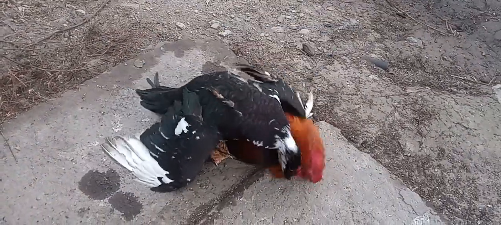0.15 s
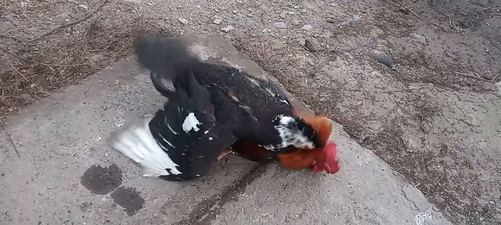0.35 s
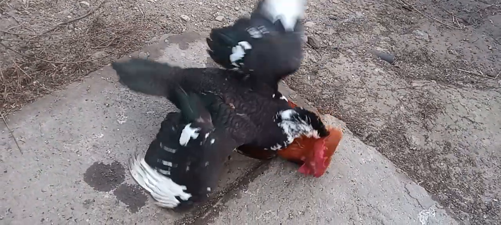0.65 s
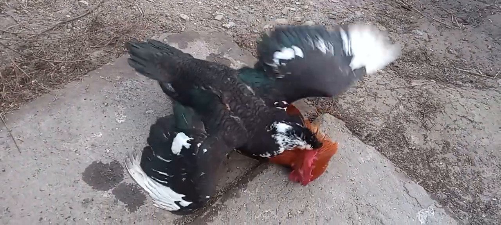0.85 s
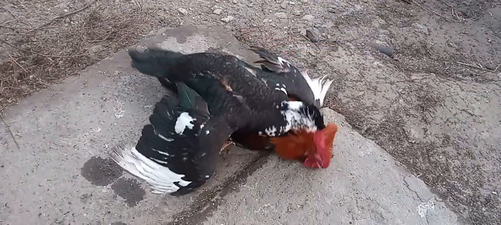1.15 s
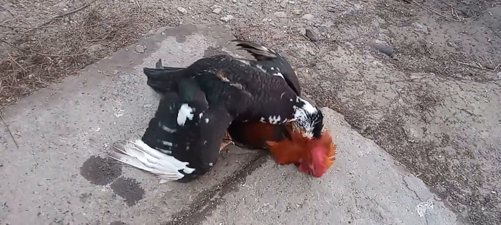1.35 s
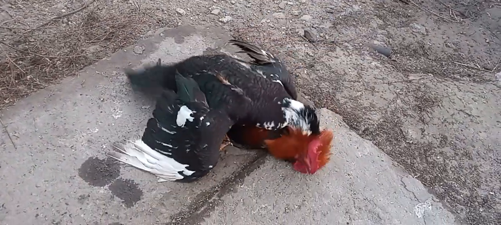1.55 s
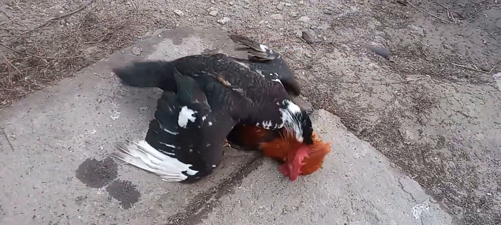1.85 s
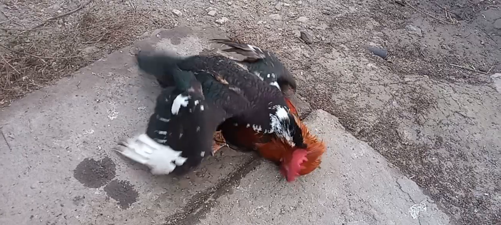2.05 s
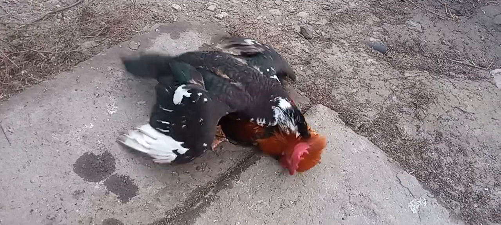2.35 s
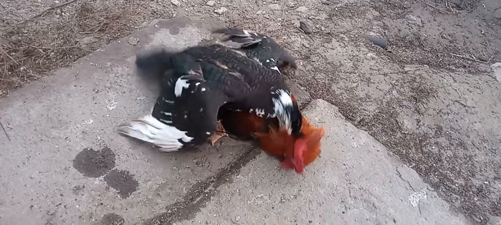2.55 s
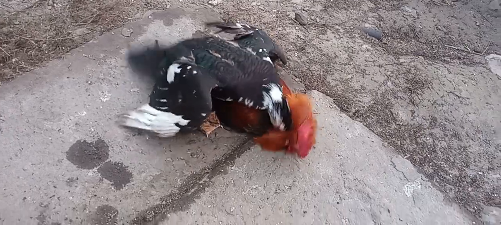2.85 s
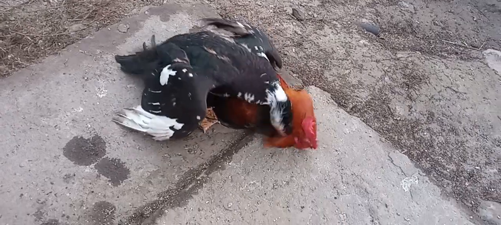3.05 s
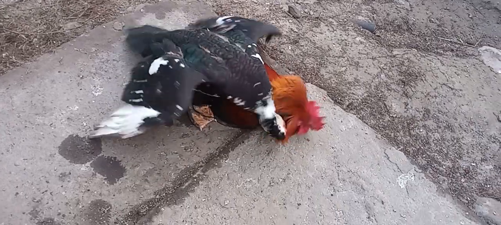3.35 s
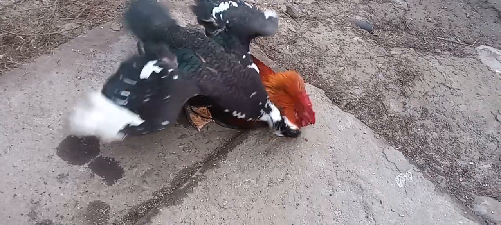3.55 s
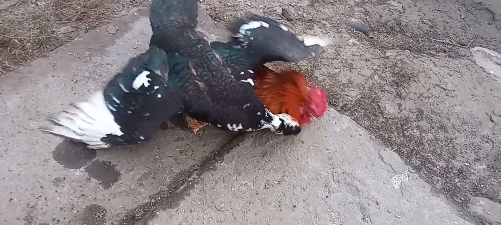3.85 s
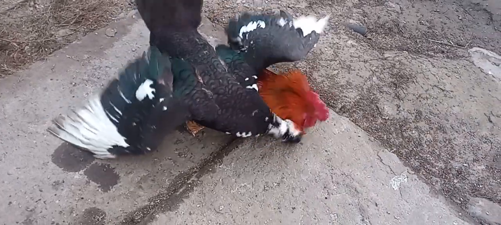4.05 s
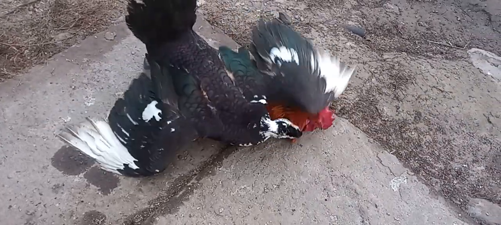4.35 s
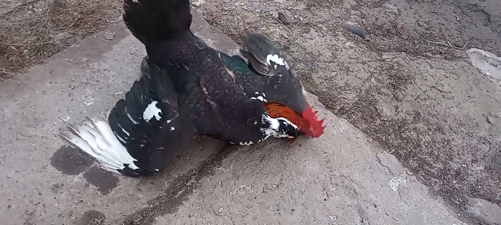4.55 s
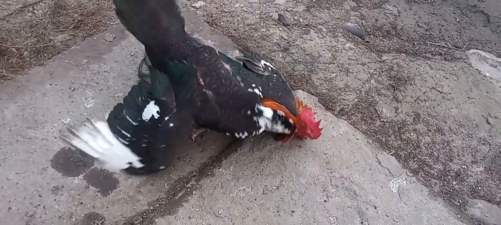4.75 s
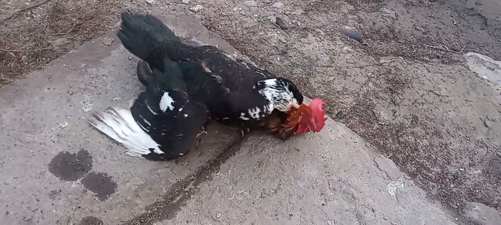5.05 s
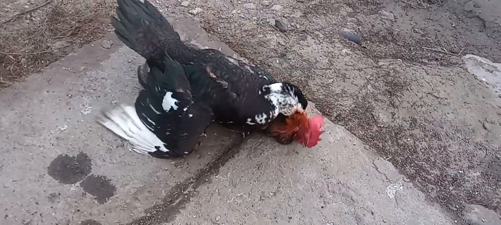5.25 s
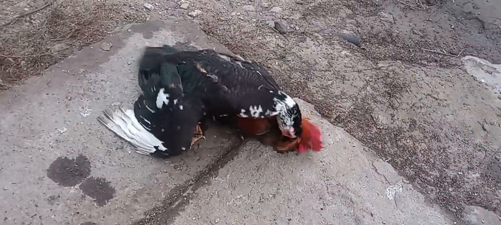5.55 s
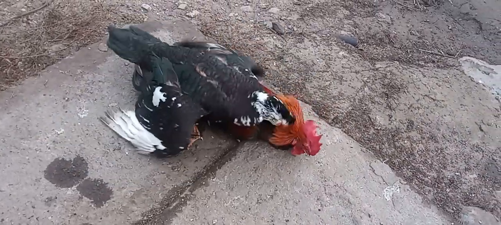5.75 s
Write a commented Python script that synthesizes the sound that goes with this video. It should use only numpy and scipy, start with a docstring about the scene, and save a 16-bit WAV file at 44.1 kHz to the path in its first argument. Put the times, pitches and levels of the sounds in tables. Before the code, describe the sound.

Two birds struggle on a concrete slab. A quick run of hollow bill clacks leads into one loud wing slap, then sparse clacks and dry snaps; later, feather brushing, soft thuds and huffs thicken. Young birds peep thinly almost throughout. Quiet outdoor yard, close stereo microphone, short reflections.

```python
"""A young bird peeps and a bill clacks several times in a row; soon a wing slaps down hard.
A drake is pinning a rooster on a concrete slab: feathers are noise and tiny clicks, huffing bursts are
narrow noise, and the bill is a tick with a short hollow ring. Bodies bump, quills snap and squeak.
Young birds peep on as gliding tones, each peep followed by a quick flick, over quiet air and a low rumble."""
import sys
import numpy as np
from scipy import signal
from scipy.fft import rfft, irfft, next_fast_len
from scipy.io import wavfile

SR = 44100
rng = np.random.default_rng(int(sys.argv[2]) if len(sys.argv) > 2 else 0)


def bounce(signal):
    """Save signal as a 16-bit WAV file at the path given by the first command-line argument."""
    frames = np.transpose(np.atleast_2d(signal))
    limited = np.clip(frames, -1, 1)
    pcm = np.round(limited * 32767).astype(np.int16)
    wavfile.write(sys.argv[1], SR, pcm)


N = 259749
TIME = np.arange(N) / SR

# Levels marked "relative" get one more fixed gain where the sound is made.
# feathers slide over feathers and concrete:
# [start_s, length_s, swell_db from start to end, relative hiss_db, relative brush_db]
STROKES = [(0.01, 0.07, 2, -63.5, -63), (0.176, 0.04, -2.5, -58, -81), (0.262, 0.032, -4.5, -45, -44),
           (0.3, 0.13, -13, -77, -63.5), (0.962, 0.049, -14, -67, -62.5), (1.339, 0.029, -2, -63.5, -57),
           (2.746, 0.12, -3, -60.5, -52.5), (3.009, 0.096, 6, -66.5, -62), (3.14, 0.12, 2, -73, -73),
           (3.356, 0.11, 1, -60, -67), (3.5, 0.076, -1, -64.5, -61), (3.707, 0.06, 2.5, -62.5, -57),
           (3.79, 0.034, 10.5, -70, -71), (3.926, 0.048, 2, -60.5, -66.5), (4.027, 0.063, 1.5, -62, -57.5),
           (4.206, 0.14, -10, -68.5, -69.5), (4.389, 0.012, 9, -74, -66), (4.504, 0.23, 8.5, -60, -66),
           (4.843, 0.039, 7.5, -60.5, -58), (4.958, 0.042, 3, -59, -58), (5.078, 0.21, 7.5, -64.5, -78),
           (5.422, 0.17, -4, -71, -68), (5.793, 0.11, 2, -68.5, -76)]
STROKE_ATTACK_S, STROKE_RELEASE_S = 0.015, 0.014
# bright upper hiss that swells or fades: [start_s, length_s, swell_db, relative level_db]
BRIGHT_HISSES = [(4.072, 0.02, 14, -58.5), (4.504, 0.22, 24.5, -60), (4.847, 0.056, -5, -57),
                 (4.963, 0.02, 8, -52.5)]
# a wing tip scrapes the concrete: [time_s, level_db]
SCRAPE = [(3.692, -83), (3.704, -49), (3.73, -46.5), (3.765, -58)]
# wing slap and the sweep after it: [time_s, level_db]
SLAP = [(.15, -58), (.224, -79), (.229, -32.5), (.233, -21.5), (.242, -27.5), (.25, -31), (.27, -43)]
# the bodies bump: [start_s, relative level_db, time_to_die_away_s (by 60 dB)]
BUMPS = [(0.054, -54.5, 0.19), (0.254, -38, 0.36), (0.345, -64, 0.17), (1.34, -51.5, 0.16),
         (1.624, -63, .1), (2.206, -67, 0.11), (2.81, -61.5, 0.36), (3.033, -50.5, 0.22),
         (3.075, -56.5, 0.14), (3.275, -55.5, 0.12), (3.725, -53.5, 0.27), (3.813, -55, 0.16),
         (4.086, -61, 0.14), (4.409, -69, 0.089), (4.74, -59, .14), (4.862, -54, 0.41), (4.985, -64, .22)]
BUMP_ATTACK_S = 0.0045
# huffing bursts, the first the air of the wing slap, the others perhaps the drake's breath:
# [start_s, length_s, swell_db, relative level_db, centre_hz at mid-burst]
HUFFS = [(0.256, 0.029, 4, -42, 500), (2.762, 0.097, -17, -51.5, 640), (3.49, 0.091, -5.5, -54, 615),
         (3.714, 0.053, -2.5, -55.5, 470), (4.03, 0.066, -2, -51, 490), (4.526, .19, 9, -59.5, 600),
         (4.858, 0.029, -2, -53.5, 476), (4.968, 0.04, 3, -57, 520), (5.085, 0.18, -4, -71, 550),
         (5.515, 0.056, -15, -66, 680)]
HUFF_ATTACK_S, HUFF_RELEASE_S = 0.012, 0.012
HUFF_SAG_HZ = 69.73  # the centre sinks by this much over each burst

# bill clacks: [start_s, relative ring_db, ring_hz, ring_time_s, relative tick_db]
CLACKS = [(0.052, -41.5, 810, 0.05, -44.5), (0.071, -41, 791, 0.033, -50), (0.075, -41, 861, 0.049, -57),
          (0.081, -38.5, 782, 0.026, -47), (0.09, -40.5, 802, 0.031, -50), (0.94, -48, 1160, 0.018, -54),
          (0.947, -37, 766, 0.04, -43.5), (1.337, -36, 809, 0.039, -37.5), (1.623, -37, 795, 0.034, -43),
          (1.909, -44.5, 1890, 0.012, -44), (2.204, -37, 707, 0.016, -40), (2.746, -31.5, 818, 0.027, -42),
          (3.066, -41, 788, 0.047, -49.5), (5.498, -39, 884, 0.032, -44), (5.503, -47.5, 1310, .025, -57),
          (5.525, -55.5, 1140, .025, -61)]
# ways the hollow bill rings: [multiple of ring_hz, level_db]
BILL_MODES = [(0.639, -12), (.83, -4.5), (0.998, 0.5), (1.362, -11.5), (1.62, -15), (2.45, -22.5)]
# dry snaps of quills and claws on the concrete: [start_s, relative level_db, lower_edge_hz]
SNAPS = [(0.2325, -35, 2400), (0.236, -25.5, 2430), (0.241, -37, 2400), (1.052, -45, 9000),
         (1.332, -43, 2400), (1.337, -32, 2440), (1.343, -43, 2400), (1.62, -48, 2400),
         (1.909, -31.5, 2390), (1.991, -42.5, 9000), (2.204, -62, 5000), (2.326, -45, 9000),
         (2.343, -33.5, 9000), (2.363, -46, 9000), (2.435, -48, 1000), (2.742, -21, 2430),
         (2.745, -40, 2400), (5.085, -35, 7950)]
SNAP_WIDTH_HZ = 4500
# feather squeaks: [time_s, level_db, pitch_hz]
SQUEAKS = [(0.501, -42.5, 6030), (1.7572, -53.5, 5750), (2.1096, -40, 6710)]
# course of a squeak: [time_s from its own zero, pitch_ratio, level_db]
SQUEAK_SHAPE = [(-.008, .98, -22), (0, .995, -3), (.006, 1.0, 0), (.014, .995, -2), (.026, .985, -22)]
# tones in a squeak: [multiple of its pitch, level_db]
SQUEAK_PARTIALS = [(0.872, -13.5), (1.003, -3), (1.152, -4.5), (1.31, -3), (1.552, -9.5), (1.798, -7)]

# near bird: [time_s, peep_db, pitch_hz of the strong second harmonic, flick_db]
PEEPS = [(-0.016, -46.5, 5050, -33), (0.164, -45.5, 4880, -40.5), (0.7007, -37, 5090, -40),
         (0.832, -38, 5086, -40), (0.9663, -38.5, 4997, -44), (1.1045, -34, 5020, -37),
         (1.264, -36.5, 5025, -42.5), (1.471, -38.5, 5004, -44), (1.633, -39, 4970, -40),
         (1.786, -39.5, 4960, -36), (1.984, -42, 5020, -36.5), (2.1478, -39.5, 4916, -36),
         (2.3339, -38.5, 4955, -38), (2.5285, -40.5, 5004, -37), (2.7305, -42, 4790, -39),
         (2.93, -42.5, 5080, -37), (3.1333, -42.5, 4830, -39), (3.353, -43.5, 4840, -41),
         (3.555, -42, 4950, -37), (3.741, -43.5, 5054, -41.5), (3.9396, -41.5, 4910, -39),
         (4.2048, -39.5, 4966, -40.5), (5.096, -48, 5050, -39.5), (5.4008, -42, 4940, -46.5),
         (5.569, -50, 4990, -44.5), (5.711, -51, 5040, -51)]
# softer, lower peeps of a farther bird: [time_s, peep_db, pitch_hz, flick_db]
FAR_PEEPS = [(0.395, -60, 4560, -51), (0.5326, -55.5, 4520, -54.5), (0.676, -49.5, 4500, -51),
             (0.805, -52, 4560, -61), (1.063, -59, 4500, -63), (1.205, -50.5, 4540, -59),
             (1.347, -50, 4540, -64), (2.443, -65, 4550, -57.5), (2.85, -54, 4600, -59.5),
             (2.991, -49, 4650, -59), (3.2738, -50, 4520, -58), (3.689, -49.5, 4600, -61),
             (3.8408, -53, 4600, -60), (3.995, -55, 4400, -55), (4.145, -60, 4430, -64),
             (4.3095, -53, 4450, -65.5), (5.76, -60, 4590, -73)]
# course of a peep: [time_s from its own zero, pitch_ratio, level_db]
PEEP_SHAPE = [(-.011, .925, -38), (-.004, .96, -19), (-.0005, .985, -4), (.003, 1.0, 0), (.013, 1.009, -1),
              (.02, 1.01, -12), (.03, 1.0, -34)]
# course of a near flick: [time_s from its own zero, pitch_ratio, level_db]
FLICK_SHAPE = [(-.006, .76, -26), (-.002, .83, -9), (.002, .95, -2), (.005, 1.02, 0), (.012, 1.01, -2),
               (.016, .9, -9), (.023, .82, -22)]
# tones in a peep: [multiple of its pitch, level_db]
PEEP_PARTIALS = [(0.502, -18.5), (1, -2), (1.528, -23.5)]
# tones in the raspy near flick: [multiple of its pitch, level_db]
FLICK_PARTIALS = [(0.859, -13.5), (.99, -6), (1.06, -24)]
FLICK_HZ, FAR_FLICK_HZ = 3672, 3500
FLICK_SPREAD = 0.0299  # share by which the pitch differs from one near flick to the next
FLICK_AFTER_S, FAR_FLICK_AFTER_S = 0.019, 0.027  # from a peep's time to its flick's time
YARD_T60_S = 0.16  # time for the yard's scatter to fall by 60 dB
WALL_ECHO_S, WALL_ECHO_DB = 0.05, -21
# faint tones, short or long, one of them ringing after the slap: [start_s, length_s, pitch_hz, level_db]
FAINT_TONES = [(0.3, 0.097, 1900, -59), (1.925, 0.033, 813, -66), (2.09, 0.12, 614, -74.5),
               (2.13, 0.29, 1915, -67.5), (2.431, 0.0069, 1240, -61)]

# light rustle of plumage between strokes: [time_s, relative level_db]
PLUMAGE = [(0, -63), (.55, -55), (1.25, -59.5), (1.5, -63.5), (2.25, -63.5), (2.55, -61), (2.92, -59.5),
           (4.8, -62), (5.15, -57), (5.89, -63)]
PLUMAGE_WAVER_DB = -3.84
# swells of the low rumble: [start_s, length_s, level_db]
RUMBLE_SWELLS = [(0.28, 0.084, -62), (2.17, 0.056, -61), (3.06, 0.16, -74), (4.905, 0.039, -67)]
RUMBLE_DB, RUMBLE_WAVER_DB = -78, 2.5
AIR_DB, AIR_WAVER_DB = -70.5, 2.0

# tone colour of hissing feathers: [frequency_hz, level_db per Hz]
HISS = [(1500, -7.5), (2600, -8.5), (3600, -5.5), (5000, -4), (6600, 4.5), (7800, -4), (9600, 1),
        (12500, -13), (15500, -6.5)]
# tone colour of brushing feathers: [frequency_hz, level_db per Hz]
BRUSH = [(450, -20), (800, 0.5), (1100, 8.5), (1600, 1), (2500, -1.5), (3500, 5), (5000, -8), (8000, -23),
         (15000, -53)]
# tone colour of the bright upper hiss: [frequency_hz, level_db per Hz]
BRIGHT_COLOUR = [(4500, -29), (7000, 0), (8300, 2.5), (9300, 8), (11200, -5), (13000, -11), (15500, -12)]
# resonances of the scrape: [frequency_hz, level_db per Hz]
SCRAPE_COLOUR = [(1100, -11), (1520, -3.5), (1900, 2), (2400, -9), (3100, -3), (4000, -18), (4700, -9),
                 (8000, -42)]
# tone colour of the wing slap: [frequency_hz, level_db per Hz]
SLAP_COLOUR = [(80, -24), (250, -4), (500, 17.5), (1100, 9.5), (2400, -2), (3800, 13), (6500, 9),
               (10000, 10), (13000, 10), (15500, 9.5)]
# tone colour of the bumps: [frequency_hz, level_db per Hz]
THUMP = [(50, -77), (120, -5.5), (240, 8.5), (380, 10.5), (550, -0.5), (1000, -18)]
# tone colour of the outdoor air: [frequency_hz, level_db per Hz]
AIR = [(25, -13), (60, -7), (120, 9), (250, 2), (550, 3), (1000, -6), (2000, -1), (3500, 2), (6000, -3),
       (15000, -39)]
# tone colour of the rumble: [frequency_hz, level_db per Hz]
RUMBLE = [(25, -28), (50, 0.5), (95, 9), (135, -3.5), (220, -16.5)]

# colour of the two microphone ports: [frequency_hz, left_db, right_db]
PORTS = [(1150, -2.5, 0), (2800, -2, -6), (3380, -5, 0.5), (4660, 4, -4.5), (6070, 9, -4.5),
         (7580, 4.5, -6), (8280, -15, -7.5), (9840, -22, 2.5), (11800, -14.5, -14), (13000, -14, -12.5),
         (15300, -1.5, -1.5)]
# how far the left port leads the right: [frequency_hz, phase_radians]
PORT_PHASE = [(50, 0), (1100, -.5), (2000, 0), (2700, 1), (3400, 1), (4300, 1.42), (4850, 5), (6300, 4.5),
              (7100, 3), (7900, 1.24), (9600, 2.6), (12000, 1), (14300, 1.4), (15700, 4)]
CUTOFF_HZ = 15900


def feathers():
    """Sliding feathers hiss and brush with each stroke, and a wing tip scrapes the slab."""
    hiss_gain = brush_gain = 0
    for s, length, swell_db, hiss_db, brush_db in STROKES:
        movement = stroke(s, length, swell_db, 0, STROKE_ATTACK_S, STROKE_RELEASE_S)
        hiss_gain = hiss_gain + from_db(hiss_db) * movement
        brush_gain = brush_gain + from_db(brush_db) * movement
    hiss = from_db(7.0) * hiss_gain * fluttering(HISS, patchy_db=3.5, grain=1.17)
    brush = from_db(-0.5) * brush_gain * fluttering(BRUSH, patchy_db=3.0, grain=0.46)
    scrape = level(SCRAPE) * fluttering(SCRAPE_COLOUR, patchy_db=1.0, grain=1.8)
    return hiss + brush + scrape


def wing_slap():
    """A wing hits the slab: a sudden burst of noise and dense barb clicks, then a short sweep."""
    burst = air_noise(0.6) + 1.46 * barbs(3000, spread_db=-7.0)
    return level(SLAP) * coloured(burst, SLAP_COLOUR)


def bright_hiss():
    """Bright, grainy hiss around 9 kHz that swells or fades and stops."""
    gain = sum(stroke(*row, attack_s=0.017, release_s=0.0098) for row in BRIGHT_HISSES)
    return from_db(3) * gain * fluttering(BRIGHT_COLOUR, patchy_db=-1.5, grain=1.2)


def body_bumps():
    """Bodies bump: low noise starts quickly and dies away smoothly."""
    # ln(1000) turns the time for a 60 dB fall into the time constant of the fade
    gain = sum(stroke(s, 1 / SR, 0, db, BUMP_ATTACK_S, t60 / np.log(1000)) for s, db, t60 in BUMPS)
    return from_db(-4.0) * gain * coloured(air_noise(0.46), THUMP)


def huffing_bursts():
    """Huffing bursts of air: a narrow band of noise whose centre sinks during each burst."""
    gain = sum(stroke(*row[:4], HUFF_ATTACK_S, HUFF_RELEASE_S) for row in HUFFS)
    centre_points = []
    for s, length, _, _, hz in HUFFS:
        centre_points.append((s, hz + HUFF_SAG_HZ / 2))
        centre_points.append((s + length, hz - HUFF_SAG_HZ / 2))
    centre_hz = np.interp(TIME, *np.transpose(centre_points))
    # slow complex noise, shifted up to the centre pitch
    core = signal.butter(1, 40, fs=SR, output="sos")
    skirt = signal.butter(1, 260, fs=SR, output="sos")
    slow_noise = signal.sosfilt(np.vstack([core, skirt]), air_noise(0.44) + 1j * air_noise(0.27))
    carrier = np.exp(2j * np.pi * np.cumsum(centre_hz) / SR)
    return from_db(-5.0) * gain * rms_one(np.real(slow_noise * carrier))


def off_slab(x, gain_db):
    """The concrete throws the sound back a moment later; the lag wanders as the birds move."""
    lag = SR * (0.001345 + 0.0003 * drift(1.5))
    bounced = np.array([np.interp(np.arange(N) - lag, np.arange(N), side) for side in x])
    return x + from_db(gain_db) * bounced


def bill():
    """Each clack is a tick and a few cycles of the bill's hollow ring, which shifts with the gape."""
    out, t = np.zeros((2, N)), np.arange(SR // 10) / SR
    too_small_for_bass = signal.butter(4, 470, "high", fs=SR, output="sos")
    ratio, mode_db = np.transpose(BILL_MODES)
    sign = (-1) ** np.arange(len(ratio))  # neighbouring modes swing in opposite senses
    for s, ring_db, hz, ring_s, tick_db in CLACKS:
        strengths = sign * from_db(mode_db + rng.normal(0, 1.3, len(ratio)))
        pitches = hz * ratio * rng.normal(1, 0.02, len(ratio))
        modes = strengths @ np.sin(2 * np.pi * np.outer(pitches, t))
        ring = signal.sosfilt(too_small_for_bass, modes * from_db(-60 * t / ring_s))
        click = tick(t60=0.022, low_hz=1670, high_hz=9000)
        add(out, s, in_yard(from_db(ring_db + 6.0) * ring, wet_db=-8.5, t60=0.11))
        add(out, s, in_yard(from_db(tick_db + 8.5) * click, wet_db=-2.0, t60=0.066))
    return out


def quills_and_claws():
    """Stiff quills and claws snap against the slab, and feathers squeak grittily over each other."""
    out = calls(SQUEAKS, SQUEAK_SHAPE, SQUEAK_PARTIALS, waver=0.028, wet_db=-11)
    for s, db, low_hz in SNAPS:
        snap = from_db(db + 4) * tick(t60=0.0084, low_hz=low_hz, high_hz=low_hz + SNAP_WIDTH_HZ)
        add(out, s, in_yard(snap, wet_db=-10, t60=0.11))
    return out


def tick(t60, low_hz, high_hz):
    """A hard contact: a sharp click and brief splintery noise; peak 1."""
    t = np.arange(SR // 10) / SR
    splinters = 0.3 * rng.standard_normal(len(t)) * from_db(-60 * t / t60)
    burst = (t == 0) + splinters
    band = signal.butter(1, [low_hz, high_hz], "band", fs=SR, output="sos")
    top_cut = signal.butter(2, high_hz, fs=SR, output="sos")
    burst = signal.sosfilt(top_cut, signal.sosfilt(band, burst))
    return burst / np.abs(burst).max()


def young_birds():
    """Two birds peep; the nearer adds a flick that leaps up and drops, the farther a flatter one."""
    near = calls([row[:3] for row in PEEPS], PEEP_SHAPE, PEEP_PARTIALS, waver=0.011, wet_db=-2.5)
    flick_rows = [(s + FLICK_AFTER_S, db, FLICK_HZ * rng.normal(1, FLICK_SPREAD)) for s, _, _, db in PEEPS]
    flicks = calls(flick_rows, FLICK_SHAPE, FLICK_PARTIALS, waver=0.051, wet_db=-2.5)
    far = calls([row[:3] for row in FAR_PEEPS], PEEP_SHAPE, PEEP_PARTIALS, waver=0.012, wet_db=-1.5)
    far_flick_rows = [(s + FAR_FLICK_AFTER_S, db, FAR_FLICK_HZ) for s, _, _, db in FAR_PEEPS]
    far_flicks = calls(far_flick_rows, PEEP_SHAPE, [(0.95, 0.0085)], waver=0.03, wet_db=-1.5)
    return near + flicks + far + far_flicks


def calls(rows, shape, partials, waver, wet_db):
    """One whistle for each (time_s, level_db, pitch_hz) row, with its echo off a yard wall."""
    out = np.zeros((2, N))
    for s, db, hz in rows:
        tone = from_db(db) * whistle(shape, hz, partials, waver)
        start = s + shape[0][0]
        add(out, start, in_yard(tone, wet_db, YARD_T60_S, gap_s=0.0049))
        echo = from_db(WALL_ECHO_DB) * in_yard(tone, wet_db=-10.5, t60=0.076)
        add(out, start + WALL_ECHO_S * rng.normal(1, 0.13), echo)
    return out


def whistle(shape, hz, partials, waver):
    """A gliding, wavering tone built from sine waves; its length and bend vary from call to call."""
    s, ratio, db = np.transpose(shape)
    s = s * np.exp(0.094 * rng.standard_normal())
    ratio = ratio * (1 + 0.22 * waver * rng.standard_normal(len(s)))
    t = np.arange(s[0], s[-1], 1 / SR)
    pitch = hz * np.interp(t, s, ratio) * (1 + waver * drift(939, size=len(t)))
    phase = 2 * np.pi * np.cumsum(pitch) / SR
    flutter_db = 1.5 * drift(350, size=len(t))
    gain = from_db(np.interp(t, s, db) + flutter_db)
    return gain * sum(from_db(partial_db) * np.sin(k * phase) for k, partial_db in partials)


def faint_tones():
    """Thin, hoarse tones, short or long, that swell, sag in pitch and fade, mostly as echo."""
    out = np.zeros((2, N))
    for s, length, hz, db in FAINT_TONES:
        shape = [(0, 1.0, -12), (0.3 * length, 1.01, 0), (0.75 * length, 0.99, -1), (length, 0.96, -16)]
        tone = whistle(shape, hz, [(1, 0)], waver=0.1)
        add(out, s, in_yard(from_db(db) * tone, wet_db=2.0, t60=0.11))
    return out


def background():
    """Quiet outdoor air, a wavering low rumble and an ongoing light rustle of plumage, all shaped noise."""
    air = from_db(AIR_DB + AIR_WAVER_DB * drift(7)) * coloured(air_noise(0.95), AIR)
    swells = sum(stroke(s, length, 0, db, attack_s=0.023, release_s=0.0083) for s, length, db in RUMBLE_SWELLS)
    rumble_gain = from_db(RUMBLE_DB + RUMBLE_WAVER_DB * drift(6)) + swells
    rumble = rumble_gain * coloured(air_noise(0.17), RUMBLE)
    stirring = level(PLUMAGE) * from_db(-2.0 + PLUMAGE_WAVER_DB * drift(9))
    plumage = stirring * coloured(air_noise(3.2) + 2.1 * barbs(700, spread_db=6.5), HISS)
    return air + rumble + plumage


def fluttering(spectrum, patchy_db, grain):
    """Grainy hiss: noise and barb clicks whose bands swell and fade each on their own; rms 1."""
    edges_hz = 300 * 2 ** (np.arange(13) * 12 / 25)
    sources = [air_noise(3.06) + grain * barbs(1100, spread_db=5.0) for _ in range(2)]
    out = 0
    for k, band in enumerate(zip(edges_hz, edges_hz[1:])):
        sos = signal.butter(2, band, "band", fs=SR, output="sos")
        # neighbouring bands use different noise
        out = out + signal.sosfilt(sos, sources[k % 2]) * from_db(patchy_db * drift(60))
    return coloured(out, spectrum)


def barbs(per_s, spread_db):
    """Feather barbs flick past each other: dense clicks of uneven size; rms 1."""
    sizes = from_db(spread_db * np.minimum(rng.exponential(1, N), 4)) * rng.choice([-1, 1], N)
    happens = rng.random(N) < per_s / SR
    return rms_one(sizes * happens)


def air_noise(apart):
    """Stereo white noise: a shared part plus each side's own part, scaled by apart."""
    return rng.standard_normal(N) + apart * rng.standard_normal((2, N))


def coloured(x, spectrum):
    """Give a signal a smooth spectrum; rms about 1."""
    size = next_fast_len(N)
    gain = from_db(at_hz(spectrum, np.fft.rfftfreq(size, 1 / SR)))
    return rms_one(irfft(rfft(x, size) * gain, size)[..., :N])


def stroke(s, length, swell_db, db, attack_s, release_s):
    """Gain of one movement: it sets in, holds while swelling or fading, and lets go."""
    progress = np.clip((TIME - s) / length, 0, 1)
    before = np.maximum(s - TIME, 0) / attack_s
    after = np.maximum(TIME - s - length, 0) / release_s
    return from_db(db + swell_db * (progress - 0.5)) * np.exp(-np.minimum(before + after, 20))


def level(rows):
    """Gain along a dB curve, fading out quickly beyond its ends."""
    rows = np.array(rows)
    outside = np.abs(TIME - np.clip(TIME, rows[0, 0], rows[-1, 0]))
    return from_db(np.interp(TIME, rows[:, 0], rows[:, 1])) * np.exp(-np.minimum(outside / 0.013, 20))


def in_yard(sound, wet_db, t60, gap_s=0.0017):
    """A short sound and, after a gap, its fading scatter off ground and walls, drawn anew each time."""
    t = np.arange(SR // 4) / SR
    scatter = rng.standard_normal(len(t)) + 0.68 * rng.standard_normal((2, len(t)))
    scatter = scatter * from_db(-60 * t / t60) * np.clip((t - gap_s) / 0.0013, 0, 1)
    response = from_db(wet_db) * scatter / np.sqrt(np.sum(scatter ** 2) / 2) + (t == 0)
    return signal.fftconvolve(sound[None], response, axes=1)


def drift(rate, size=N):
    """Random wander: straight lines between chance values, rate of them per second."""
    knots = np.arange(size) * rate / SR
    return np.interp(knots, np.arange(4096), rng.standard_normal(4096))


def add(out, s, sound):
    """Mix a sound in at time s, dropping what falls outside the scene."""
    start = int(round(s * SR))
    first, last = max(start, 0), min(start + sound.shape[-1], N)
    out[..., first:last] += sound[..., first - start:last - start]


def at_hz(points, hz, axis=1):
    """One column of a table, read on a log-frequency axis."""
    points = np.array(points)
    return np.interp(np.log(hz + 1e-9), np.log(points[:, 0]), points[:, axis])


def from_db(db):
    """Turn decibels into a plain gain."""
    return 10 ** (np.asarray(db) / 20)


def rms_one(x):
    """Scale a signal to an rms of 1."""
    return x / np.sqrt(np.mean(x ** 2) + 1e-20)


def scene():
    """The struggle with its bounce off the slab, then bill, quills, young birds and background."""
    struggle = feathers() + wing_slap() + bright_hiss() + body_bumps() + huffing_bursts()
    contacts = bill() + quills_and_claws()
    voices_and_tones = young_birds() + faint_tones()
    return off_slab(struggle, gain_db=-9.5) + contacts + voices_and_tones + background()


def record(dry):
    """Each microphone port colours the sound its own way, the right one turns its phase; the top is cut."""
    size = next_fast_len(N + 2048)
    hz = np.fft.rfftfreq(size, 1 / SR)
    ports = [(600, 0, 0)] + list(PORTS)  # no colouring below 600 Hz
    left = from_db(at_hz(ports, hz, axis=1))
    right = from_db(at_hz(ports, hz, axis=2)) * np.exp(-1j * at_hz(PORT_PHASE, hz))
    heard = irfft(rfft(dry, size) * np.array([left, right]), size)[:, :N]
    top_cut = signal.ellip(10, 0.3, 80, CUTOFF_HZ, fs=SR, output="sos")
    return signal.sosfilt(top_cut, heard)


dry = scene()
out = record(dry)
bounce(out)
```